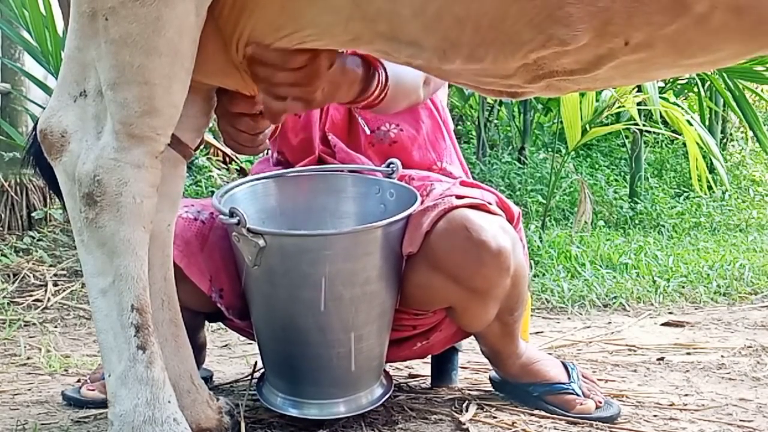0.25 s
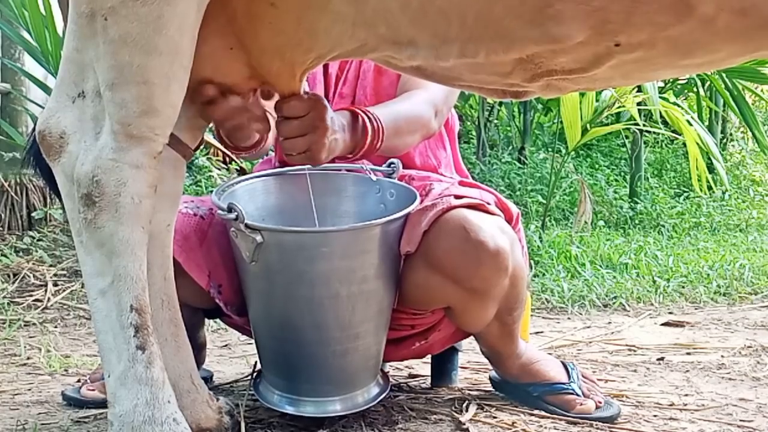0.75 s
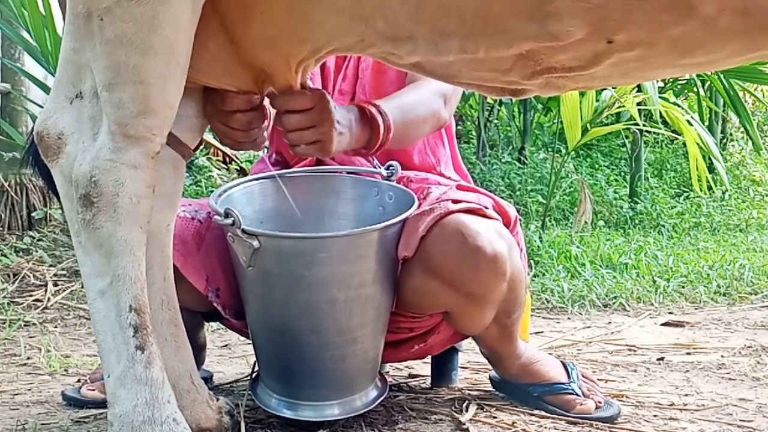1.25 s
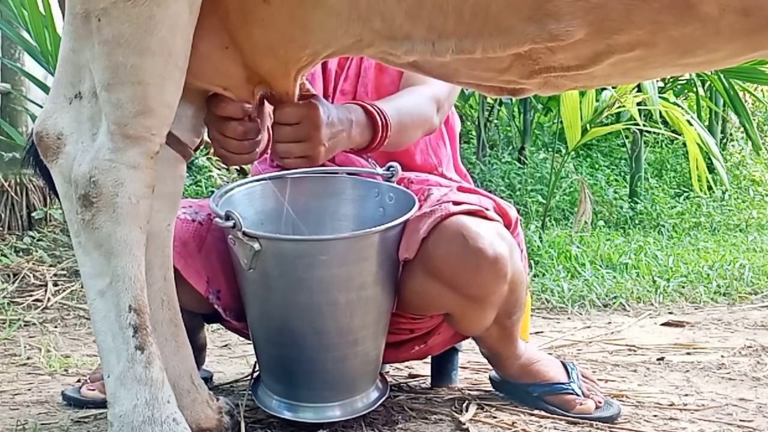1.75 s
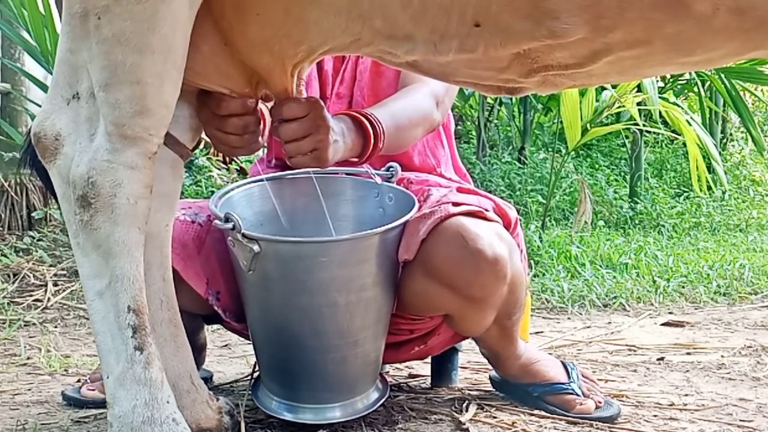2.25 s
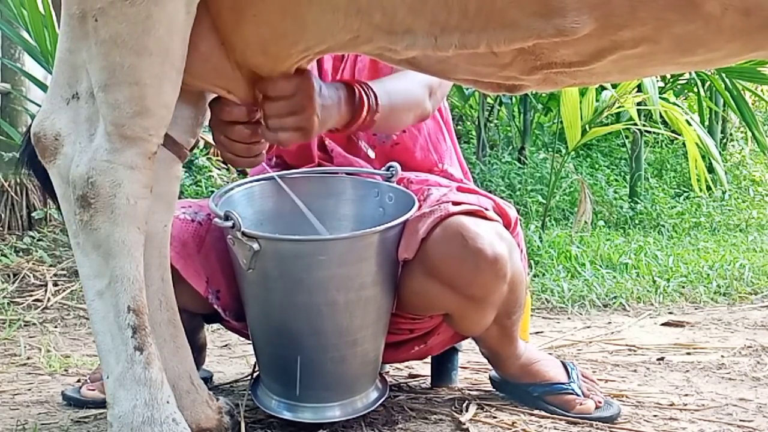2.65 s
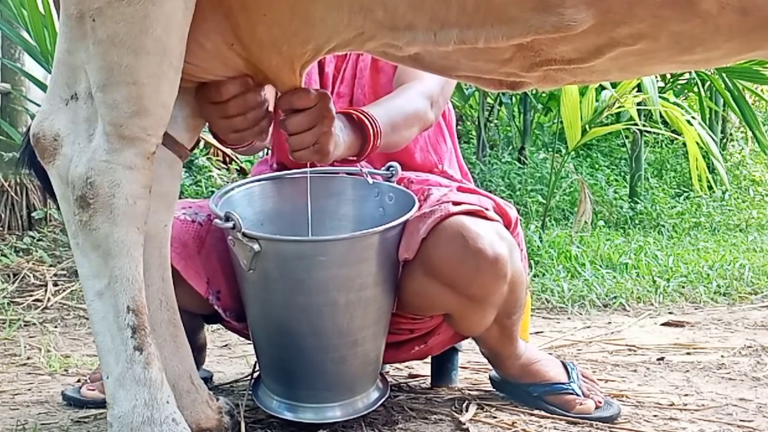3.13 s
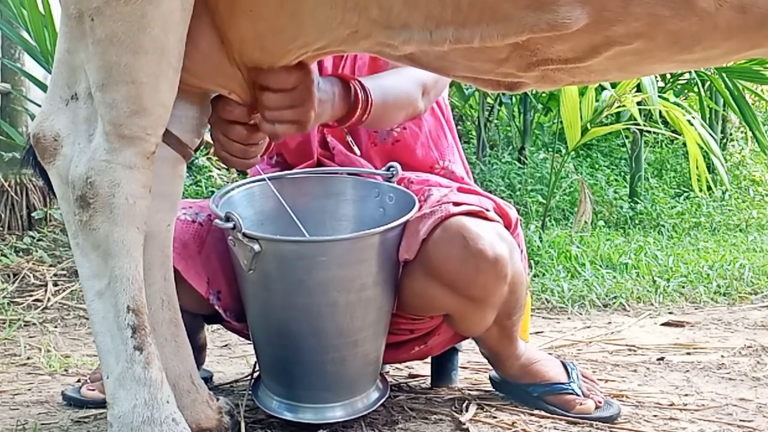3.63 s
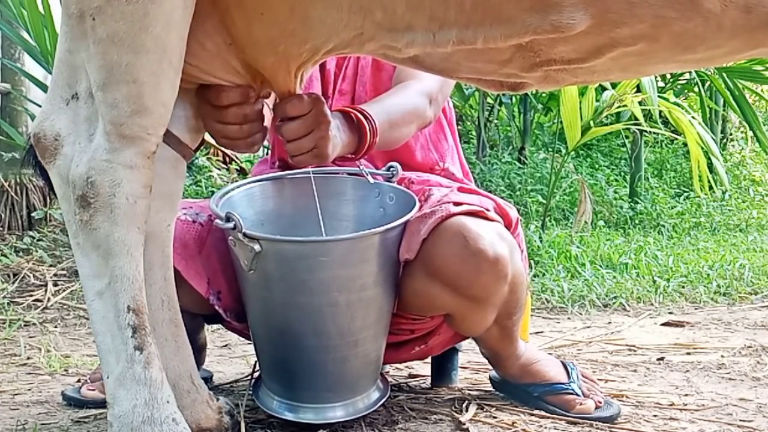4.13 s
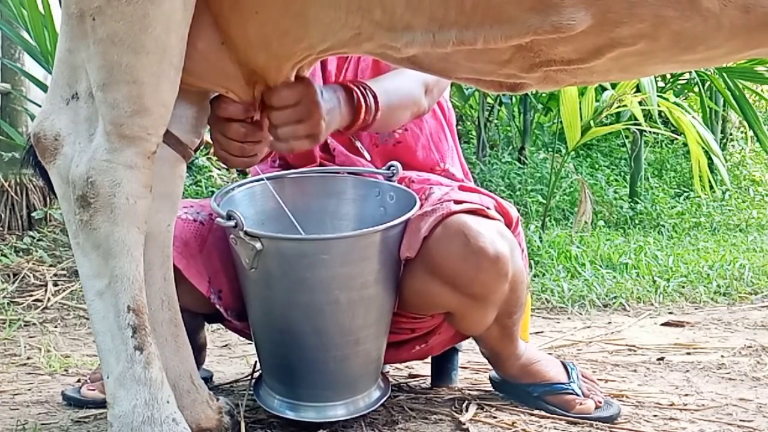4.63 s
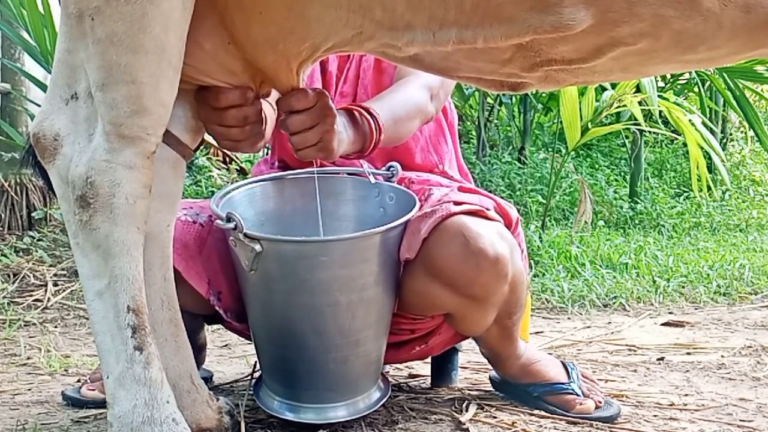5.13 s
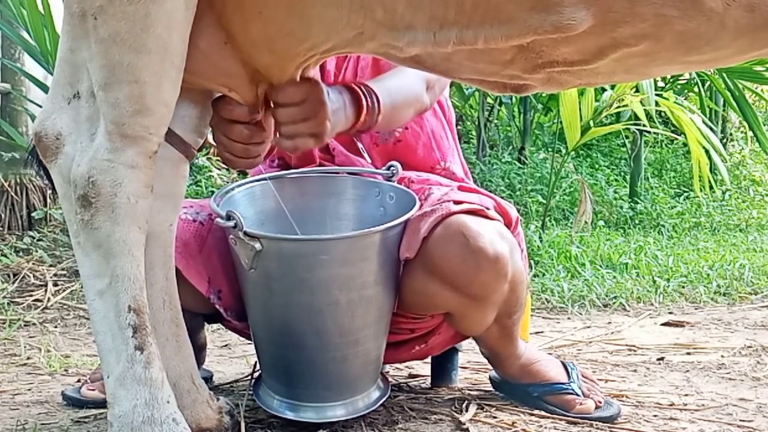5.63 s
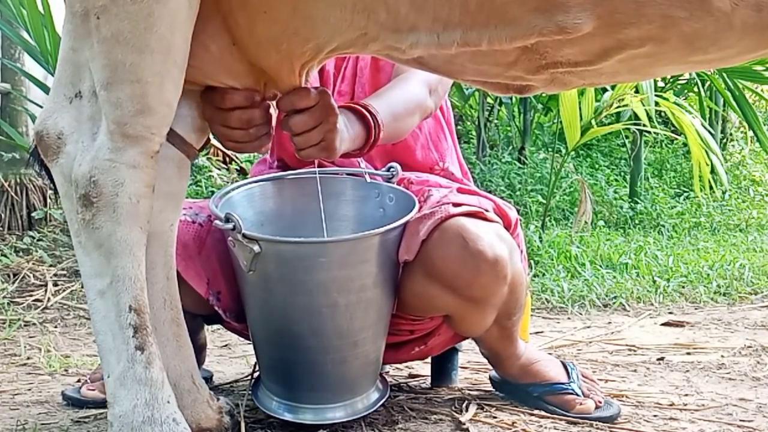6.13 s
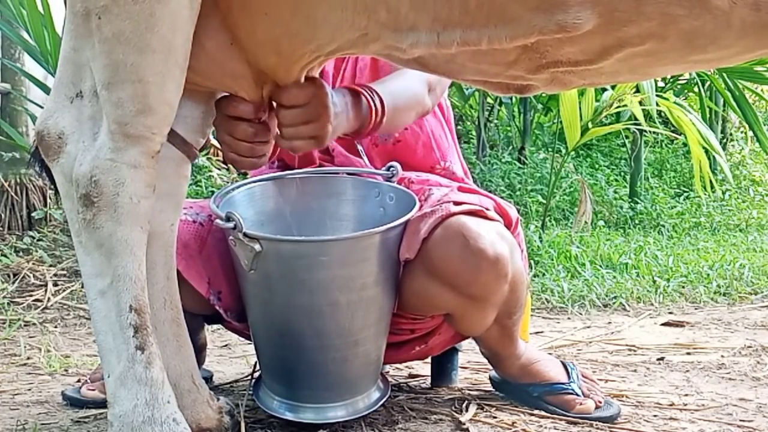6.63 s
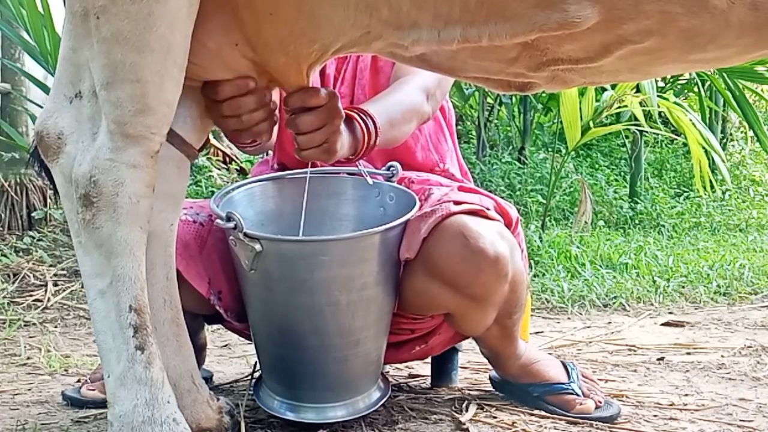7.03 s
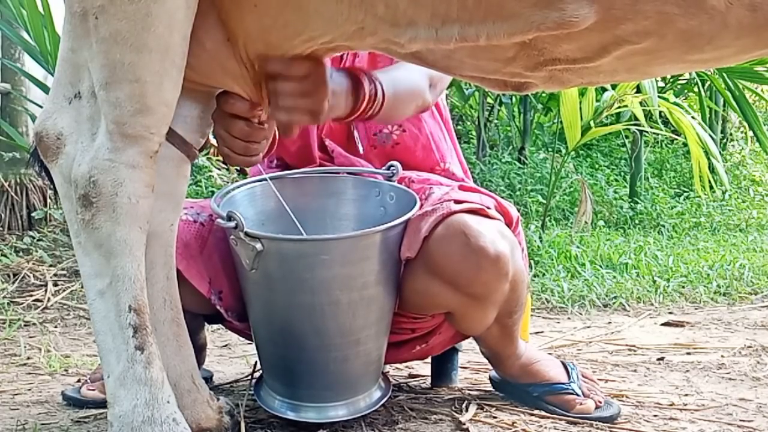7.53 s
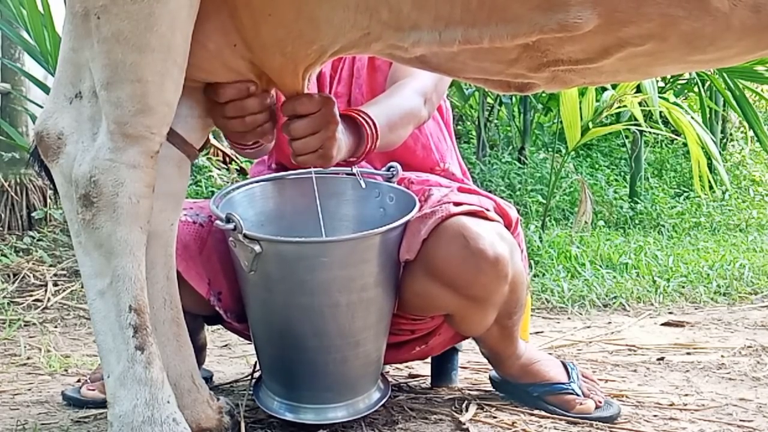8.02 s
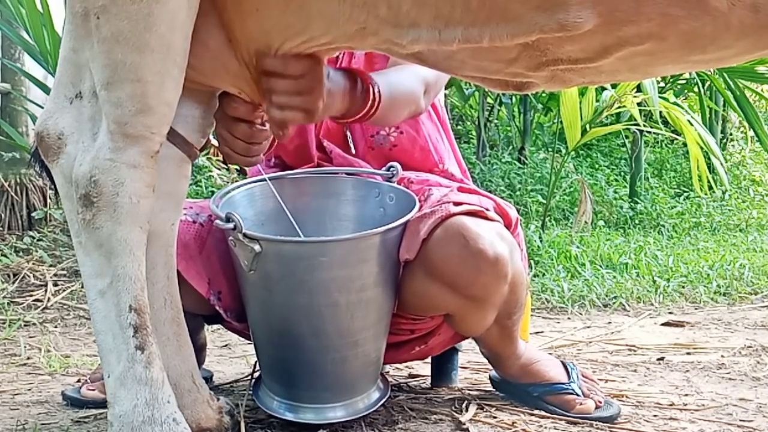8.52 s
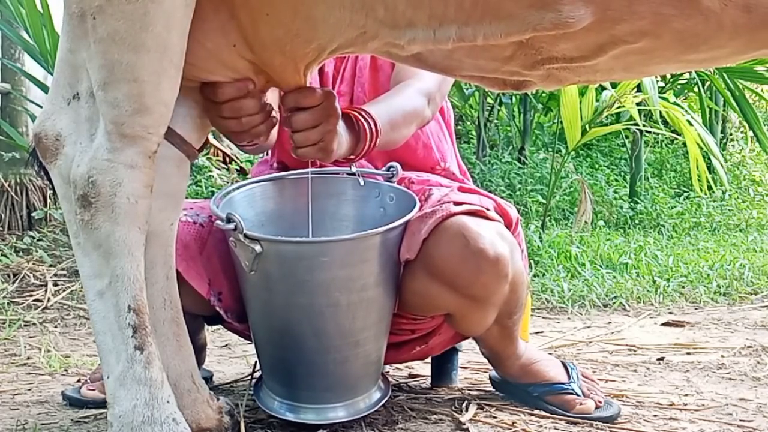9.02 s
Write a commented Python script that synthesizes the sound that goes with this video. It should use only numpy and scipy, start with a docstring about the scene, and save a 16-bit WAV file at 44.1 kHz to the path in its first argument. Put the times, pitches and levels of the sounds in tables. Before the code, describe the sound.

Hand milking outdoors: about two wet, ringing squirts a second spray into a hollow steel pail, with bubbly plops and light bangle jingles.

```python
"""Hand milking into a steel bucket

Outdoors on a quiet day, one microphone: a cow is milked by hand, the two hands taking turns.
Each jet is random drops that spray on the wall, splash in the foam and dig bubbles into the milk,
coloured by the resonances of the bucket; fat drops slap, large bubbles plop, pockets of air gurgle.
Bangles ring as the hands take a new grip; skin rubs softly, over filtered-noise air and low rumble."""
import sys
import numpy as np
from scipy import signal
from scipy.io import wavfile
from scipy.ndimage import uniform_filter1d, map_coordinates

SR = 44100
rng = np.random.default_rng(int(sys.argv[2]) if len(sys.argv) > 2 else 0)


def pcm_store(signal):
    """Save signal as 16-bit PCM."""
    levels = np.round(np.clip(np.atleast_2d(signal), -1, 1) * 32767)
    wavfile.write(sys.argv[1], SR, levels.astype(np.int16).T)


N = 408807  # samples
HZ = np.fft.rfftfreq(4096, 1 / SR)  # frequency grid of every dB curve


def amp(db):
    """Decibels to gain."""
    return 10 ** (np.asarray(db) / 20)


def evened(x):
    """Scales to an rms of 1."""
    return x / np.sqrt(np.mean(x ** 2) + 1e-20)


def steadied(x, size=2600):
    """Holds the rms near 1 over some hundredths of a second and keeps the finer grain."""
    power = uniform_filter1d(uniform_filter1d(x ** 2, size), size)
    return x / np.sqrt(power + 1e-20)


def add(mix, s, sound):
    """Mixes a sound in at s seconds."""
    part = mix[max(round(s * SR), 0):][:len(sound)]
    part += sound[:len(part)]


def spectrum(points):
    """Joins (Hz, dB) points on a log-frequency axis."""
    f, db = np.transpose(points)
    return np.interp(np.log(HZ + 1), np.log(f), db)


def lift(modes):
    """The dB curve of a set of resonances (Hz, width Hz, lift dB)."""
    return sum(db / (1 + (2 * (HZ - hz) / width) ** 2) for hz, width, db in modes)


def colour(x, curve_db):
    """Causal filter with the given dB curve: it rings after a blow, never before."""
    log_gain = np.log(amp(np.r_[curve_db, curve_db[-2:0:-1]]))
    minimum_phase = np.exp(np.conj(signal.hilbert(log_gain)))
    taps = np.fft.ifft(minimum_phase).real
    return signal.fftconvolve(x, taps[:len(HZ)])[:len(x)]


def resonate(x, hz, width):
    """A resonance of gain 1 that follows the curve hz."""
    turn = np.exp(2j * np.pi * np.cumsum(hz) / SR)
    r = np.exp(-np.pi * width / SR)
    # shift the pitch to zero, smooth, shift back
    return 2 * (turn * signal.lfilter([1 - r], [1, -r], x / turn)).real


def wobble(n, per_s):
    """Random drift of about unit size, joined by straight lines between per_s knots a second."""
    knots = rng.standard_normal(4096)
    return np.interp(np.arange(n) * per_s / SR, np.arange(len(knots)), knots)


def strike(t60, rise=0.00071):
    """The envelope of a blow: a quick swell, then a steady fade in dB."""
    t = np.arange(8000) / SR
    return amp(-60 * t / t60) * (1 - np.exp(-t / rise))


def tone(hz):
    """A steady partial as long as a blow."""
    return np.sin(2 * np.pi * hz * np.arange(8000) / SR)


# Colour of the open air before levelling: pitch_hz [Hz], level_db [dB, relative]
AIR_COLOUR = [(20, -27), (50, -7), (80, 2), (110, 10.5), (160, -0.5), (300, -4.5), (700, -10), (2000, -12),
              (5800, -13), (6700, 1), (7600, -4.5), (8800, -7), (9400, -23), (16000, -25.5)]


def air(air_db=-71.5, rumble_db=-86):
    """Faint outdoor hiss with a brighter band in the treble, over an uneven low rumble."""
    hiss = evened(colour(rng.standard_normal(N), spectrum(AIR_COLOUR)))
    low = spectrum([(25, -20), (70, -6.0), (108, -6.5), (150, 0), (400, -15.5), (2000, -88)])
    rumble = evened(colour(rng.standard_normal(N), low))
    drift_db = wobble(N, 4)
    gust_db = 3.5 * wobble(N, 14)
    return hiss * amp(air_db + drift_db) + rumble * amp(rumble_db + gust_db)


# Soft low bumps: start_s [s], length_s [s], level_db [dB rms before the swell]
BUMP_TIMES = [(0, 0.13, -70.5), (0.17, 0.21, -73), (0.399, 0.076, -67), (0.79, 0.06, -68.5),
              (1.66, 0.08, -69), (2.456, 0.14, -69), (5.591, 0.14, -72), (7.699, 0.17, -73)]


def bumps():
    """Dull swells of bass noise that rise a little out of the rumble."""
    out = np.zeros(N)
    bass_colour = spectrum([(25, -24), (65, -2), (130, 2), (250, -14), (1000, -61)])
    for s, length, db in BUMP_TIMES:
        n = round(length * SR)
        bass = colour(rng.standard_normal(n), bass_colour)
        add(out, s, amp(db) * evened(bass) * signal.windows.hann(n))
    return out


# Bangles knocking together, each swelling from 1 ms before start_s [s]; levels before the common trims:
# tick_db [dB], middle_low_db [dB], middle_high_db [dB], small_db [dB]
CLINK_HITS = [(0.086, -51, -65, -61, -84), (0.1265, -51, -67, -64, -80), (0.378, -26, -70, -48, -57),
              (0.5283, -43, -68, -76, -55), (0.5691, -58, -76, -63, -83), (0.6389, -52, -78, -88, -65),
              (1.8756, -41.5, -58, -68, -60), (2.85, -47, -56.5, -77, -56), (2.896, -37.5, -69, -64, -64),
              (4.801, -47, -62, -72, -71), (5.784, -47, -74, -83, -70), (5.836, -38, -57, -57, -61),
              (5.851, -46, -67, -62, -68), (6.2272, -58, -52.5, -76, -66), (6.7166, -51, -64, -85, -55),
              (7.685, -43.5, -53, -70, -81), (7.8071, -44, -62, -73, -53), (7.834, -38, -69, -53, -69),
              (7.8501, -34.5, -61, -57, -53.5), (8.788, -37.5, -71, -66, -50.5),
              (8.8326, -37.5, -63, -64, -55.5)]
# Ring modes of the bangles: ring [0 large, 1 middle low, 2 middle high, 3 small],
# pitch_hz [Hz, before a slight scatter], level_db [dB, relative], t60_s [s, before the wrist's damping]
BANGLE_MODES = [(0, 5180, 6.5, 0.095), (0, 9760, 6.5, 0.14), (1, 6500, -9, 0.084), (1, 6610, 1.5, 0.095),
                (2, 12700, -15, 0.086), (2, 12830, -1.5, 0.1), (3, 8440, 3, 0.081), (3, 15340, -22, 0.092)]
# the large bangle is only shaken along: its ring follows the tick (dB added to tick_db)
LARGE_BANGLE_DB = -38


def clinks(tick_trim_db=-9, tick_t60=0.037, ring_trim_db=3, damping=0.24):
    """A hard tick, then each bangle rings as strongly as it was hit, damped more or less by the wrist."""
    out = np.zeros(N)
    tick_colour = spectrum([(1000, -28), (4000, -23.5), (5500, -11.0), (7500, 2.5), (11000, -5.0), (15000, -13)])
    for s, db, *rings_db in CLINK_HITS:
        hit_db = (db + LARGE_BANGLE_DB, *rings_db)
        envelope = strike(tick_t60, rise=0.00034)
        tick = colour(rng.standard_normal(len(envelope)) * envelope, tick_colour)
        add(out, s - .001, amp(db + tick_trim_db) * tick / abs(tick).max())
        for which, hz, mode_db, t60 in BANGLE_MODES:
            partial = tone(hz * rng.normal(1, 0.0026))
            ring = partial * strike(t60 * np.exp(damping * rng.standard_normal()))
            add(out, s - .001, amp(hit_db[round(which)] + mode_db + ring_trim_db) * ring)
    return out


# A hand nudges up into the udder: start_s [s], length_s [s],
# level_db [dB rms of the body before the swell], pitch_hz [Hz, 0.3 of the way through]
NUDGE_TIMES = [(0.148, 0.22, -53.5, 286), (1.672, 0.074, -58.5, 294), (2.586, 0.3, -64, 312),
               (4.572, 0.17, -69.5, 305), (6.469, 0.12, -52.5, 300), (8.55, 0.11, -58.5, 277)]


def nudges(width=90, sag=0.4):
    """Skin rubs on soft flesh: a quick swell whose pitch sags as the udder gives way."""
    out = np.zeros(N)
    skin_colour = spectrum([(150, -9), (700, -1.0), (1400, -18.0), (4000, -12.5), (8000, -16), (14000, -25)])
    for s, length, db, hz in NUDGE_TIMES:
        u = np.linspace(0, 1, round(length * SR))
        pitch = hz * np.exp(-sag * (u - .3))
        body = resonate(rng.standard_normal(len(u)), pitch, width)
        body = resonate(body, pitch, width * 2)
        skin = colour(rng.standard_normal(len(u)), skin_colour)
        swell = np.sin(np.pi * np.sqrt(u)) ** 2
        add(out, s, amp(db) * swell * (evened(body) + amp(-12.5) * evened(skin)))
    return out


# Resonances of the air and steel of the bucket: pitch_hz [Hz], width_hz [Hz], lift_db [dB]
BUCKET_MODES = [(388, 11.6, 12.5), (437.8, 40.5, 20.5), (568, 18, 9.5), (822.5, 115, 12), (1104, 320, 4.5),
                (1313, 213, 14), (1710, 110, 0.5), (1930, 38, 1), (2630, 380, 9.5), (3380, 370, 6.5),
                (4303, 95, 4), (4300, 150, -0.5), (5960, 290, 3), (7370, 330, 3.5), (7940, 52, 10)]


def bucket_hollow():
    """The dB curve that the hollow of the bucket lays on sounds made inside it."""
    return lift(BUCKET_MODES)


def walls(x, t60=0.042, echo_db=2):
    """Sound bounces between the steel walls, in another random pattern at every call."""
    t = np.arange(4096) / SR
    echoes = rng.standard_normal(len(t)) * amp(-60 * t / t60) * (t > .0005)
    echoes = echoes / np.linalg.norm(echoes)
    return x + amp(echo_db) * signal.fftconvolve(x, echoes)[:len(x)]


def drops(n, per_s, spread_db):
    """A random train of tiny impacts, a few much larger than the rest."""
    chance = rng.random(n)
    size = np.minimum(rng.exponential(1, n), 4)
    return (chance < per_s / SR) * amp(spread_db * size) * rng.choice([-1, 1], n)


def bubble(hz, cycles, rise):
    """A bubble swells and rings for a few cycles, its pitch rising as it nears the surface."""
    age = np.arange(3000) / SR * hz / cycles  # in decay times
    swell = 1 - np.exp(-(age * cycles) ** 2 * 2)
    return np.sin(2 * np.pi * cycles * age * (1 + rise * age)) * np.exp(-age) * swell


def bubbling(n, low_hz, high_hz, per_s, cycles, spread_db=2.5, count=20):
    """Bubbles of many sizes, each size born at its own random moments."""
    place = (np.arange(count) + rng.random(count)) / count
    out = np.zeros(n)
    for hz in low_hz * (high_hz / low_hz) ** place:
        births = drops(n, per_s / count, spread_db)
        out += signal.fftconvolve(births, bubble(hz, cycles, 0.0213))[:n]
    return out


def small_bubbles(n):
    """Air dragged just under the surface rings in the hollow of the bucket."""
    return colour(bubbling(n, 575.8, 1171, 300, 8.6), bucket_hollow())


PATCH_DB = 3.5  # spread of the wandering patches (dB)


def wandering(x, patch_hz=330, patch_s=0.03977):
    """As the landing place moves, other resonances are favoured: patches of spectrum swell and fade."""
    hz, t, z = signal.stft(x, SR, nperseg=512, noverlap=384)
    place = np.meshgrid(hz / patch_hz, t / patch_s, indexing="ij")
    field = map_coordinates(rng.standard_normal((256, 64)), place, order=3, mode="mirror")
    patches_db = PATCH_DB * np.clip(evened(field), -2.2, 2.2)
    return signal.istft(z * amp(patches_db), SR, nperseg=512, noverlap=384)[1][:len(x)]


# the teat opens to a thin jet, the fist closes, the flow arches and sags
OPEN_DB_PER_S, LEAD_DB, ATTACK_S, ARCH_DB = 360, -13.5, 0.061, 2.94
# the squeeze is never even: (scale dB, changes a second)
SURGE_DB, SURGE_PER_S = 1.28, 29.8
# the hand lets go and the flow dies ever faster
RELEASE_S, RELEASE_DB, RELEASE_BEND = 0.07, -19, 1.08


def flow(t, lead, squeeze, sag_db):
    """The strength of the jet in dB, t seconds into a pull."""
    emptied = np.clip((t - lead) / squeeze, 0, 1)
    opening = OPEN_DB_PER_S * np.minimum(t, 0)
    thin_jet = LEAD_DB * np.clip((lead - t) / ATTACK_S, 0, 1)
    hold = ARCH_DB * np.sin(np.pi * emptied) - sag_db * emptied
    surge = SURGE_DB * wobble(len(t), SURGE_PER_S)
    release = RELEASE_DB * (np.maximum(t - lead - squeeze, 0) / RELEASE_S) ** RELEASE_BEND
    return opening + thin_jet + hold + surge + release


# One pull on a teat: start_s [s], thin_lead_s [s], full_squeeze_s [s],
# wall_s [s from the start until the jet finds the milk], flow_sag_db [dB],
# wall_spray_db [dB], milk_spray_db [dB], mist_db [dB tilt of the spray's top treble],
# splash_db [dB in the foam], small_bubbles_db [dB in the milk], crater_pitch_hz [Hz in the foam];
# the four layer levels are rms before the flow and the wall shape them
PULLS = [(0.677, 0.043, 0.033, 0.122, 10, -70, -69.5, 9, -81, -92, 2300),
         (0.895, 0.14, 0.13, 0.2, 4, -49.5, -46.5, 0, -43, -47.5, 2660),
         (1.465, 0.089, 0.066, 0.037, 5.5, -48, -56.5, 2.5, -61.5, -69, 2700),
         (1.64, 0.048, 0.078, 0.01, 1.5, -61, -65, 4, -64, -73, 2140),
         (1.968, 0.087, 0.25, 0.03, 4.5, -66, -54, 2.5, -54.5, -59, 2450),
         (2.473, 0.099, 0.25, 0.1, 9, -43, -49, -5.5, -51.5, -73.5, 2570),
         (2.982, 0.041, 0.27, 0.0016, 7.5, -69, -47.5, 1, -46, -54.5, 2290),
         (3.445, 0.06, 0.25, 0.12, 3.5, -48.5, -54, 0, -53, -72, 2880),
         (4.012, 0.046, 0.21, 0.08, 9, -44, -42, -2, -48.5, -79, 2070),
         (4.438, 0.024, 0.21, 0.057, -3, -51.5, -60, 0.5, -57.5, -75, 2300),
         (4.915, 0.077, 0.24, 0.293, 7.5, -44.5, -41, 0.5, -50, -69, 1300),
         (5.343, 0.094, 0.26, 0.087, 13, -51.5, -55.5, 0, -49.5, -57.5, 2250),
         (5.915, 0.18, 0.15, 0.23, 13, -45.5, -51, 1.5, -46, -46.5, 1350),
         (6.395, 0.064, 0.16, 0.026, -8, -51, -65, 0, -62, -79, 2320),
         (6.921, 0.056, 0.29, 0.075, 6.5, -45.5, -57, -1, -52.5, -63, 2390),
         (7.399, 0.054, 0.15, 0.019, -3, -43.5, -65.5, 3.5, -59.5, -71, 2310),
         (7.885, 0.063, 0.33, 0.072, 18, -51.5, -52.5, 4.5, -44.5, -50.5, 1440),
         (8.352, 0.077, 0.26, 0.11, -2.5, -53.5, -63, 4.5, -59, -82, 2010),
         (8.933, 0.076, 0.21, 0.03, 4.5, -46, -53, 4, -50, -58.5, 2140)]
# Colour of the splash in the foam before levelling: pitch_hz [Hz], level_db [dB, relative]
SPLASH_COLOUR = [(200, -85), (800, -25.5), (1150, -14), (1800, 4), (2700, -4), (3200, -2), (4500, 5.5),
                 (6500, -20.5), (16000, -34)]
# Colour of the spray before levelling, also in the spurts: pitch_hz [Hz], level_db [dB, relative]
SPRAY_COLOUR = [(500, -64), (2500, -16), (4300, -4), (6000, 1), (7700, -0.5), (9000, -4), (10500, -13),
                (12500, -16), (14000, -19.5), (16000, -17.5)]
# the jet slides from wall to milk; on the wall it splashes less, traps little air and rings at WALL_HZ
SLIDE_S, WALL_SPLASH_DB, WALL_BUBBLES_DB, WALL_HZ = 0.02, -4.5, -25, 2780
BUBBLE_GROWTH = 1.4  # small bubbles grow faster than the flow (dB per dB)
MIST_HZ, MIST_WIDTH_HZ = 7500, 2200  # where the hiss of the fine mist sets in


def squirt(start, lead, squeeze, wall_s, sag_db, wall_spray_db, milk_spray_db, mist_db,
           splash_db, bubbles_db, crater_hz):
    """One pull on a teat: the jet breaks into drops, flutters, and wanders between wall, foam and milk."""
    t = np.arange(-.07, lead + squeeze + .14, 1 / SR)
    n = len(t)
    flow_db = flow(t, lead, squeeze, sag_db)
    on_wall = .5 - .5 * np.tanh((t - wall_s) / SLIDE_S)
    flutter_db = 2 * wobble(n, 89.28) + 1.2 * wobble(n, 300)  # the jet necks and breaks unevenly
    travel = np.linspace(0, np.pi / 2, n)  # fades from one echo pattern to another

    def patter(points, per_s, spread_db, pops):
        """Drops and popping foam cells echo in the bucket."""
        hits = evened(drops(n, per_s, spread_db) * amp(flutter_db)) + pops
        echoed = np.cos(travel) * walls(hits) + np.sin(travel) * walls(hits)
        return evened(colour(wandering(echoed), spectrum(points) + bucket_hollow()))

    foam_pops = 0.3 * evened(bubbling(n, 1111.4, 4456, 400, 13.7, spread_db=4.0))
    splash = patter(SPLASH_COLOUR, 1600, 2.6, foam_pops)
    ring_hz = crater_hz + (WALL_HZ - crater_hz) * on_wall
    crater = evened(resonate(splash, ring_hz, 1230))  # the jet digs a crater that rings
    splash = splash + amp(6.5) * crater

    fine_pops = 0.29 * evened(bubbling(n, 4500, 11020, 300, 30, spread_db=2.5))
    spray = patter(SPRAY_COLOUR, 6500, 4.5, fine_pops)
    # a finer mist hisses higher
    spray = colour(spray, mist_db * np.clip((HZ - MIST_HZ) / MIST_WIDTH_HZ, 0, 1))

    splash_level = flow_db + splash_db + WALL_SPLASH_DB * on_wall
    spray_level = flow_db + milk_spray_db + (wall_spray_db - milk_spray_db) * on_wall
    bubble_level = BUBBLE_GROWTH * flow_db + bubbles_db + WALL_BUBBLES_DB * on_wall
    layers = ((splash, splash_level), (spray, spray_level), (small_bubbles(n), bubble_level))
    jet = sum(steadied(x) * amp(db) for x, db in layers)
    return start + t[0], jet * signal.windows.tukey(n, .04)


# The jet digs deep, or its last dribble falls in, and the milk gurgles:
# start_s [s], length_s [s], large_bubbles_db [dB rms], small_bubbles_db [dB rms], both before the heave
GURGLE_TIMES = [(1.012, 0.16, -59.5, -66), (1.337, 0.015, -90, -80), (1.444, 0.055, -77, -86),
                (1.546, 0.038, -64, -71), (2.01, 0.05, -67.5, -80), (2.112, 0.12, -58, -57),
                (2.903, 0.03, -75, -91), (3.02, 0.03, -67, -56.5), (3.178, 0.18, -50.5, -55.5),
                (3.573, 0.046, -67.5, -61.5), (3.995, 0.035, -69.5, -73), (4.21, 0.021, -95, -69.5),
                (4.744, 0.035, -85, -72.5), (5.097, 0.011, -80, -81), (5.291, 0.046, -73, -70.5),
                (5.455, 0.21, -53.5, -61.5), (6.095, 0.012, -86, -56.5), (6.15, 0.023, -64.5, -68),
                (6.265, 0.051, -65, -63.5), (6.483, 0.15, -61, -69), (7.033, 0.012, -63, -74),
                (7.164, 0.16, -52.5, -62.5), (7.493, 0.076, -64, -71), (7.989, 0.3, -52, -58),
                (8.52, 0.19, -65.5, -60), (8.945, 0.028, -65.5, -76), (9.029, 0.15, -60.5, -73),
                (9.19, 0.09, -49.5, -59)]
# every gurgle swells and dies quickly
DIG_DB_PER_S, CLOSE_DB_PER_S = 527, 384


def gurgle(start, length, large_db, small_db, heave_db=1.0):
    """The jet digs deeper: large bubbles boom in the bucket until the pocket closes."""
    t = np.arange(-.08, length + .12, 1 / SR)
    n = len(t)
    boom_colour = 0.86 * bucket_hollow() + spectrum([(120, -20.5), (300, -3)])
    deep = colour(bubbling(n, 318.2, 550, 200, 7.2), boom_colour)
    swell_db = DIG_DB_PER_S * np.minimum(t, 0) - CLOSE_DB_PER_S * np.maximum(t - length, 0)
    swell_db = swell_db + heave_db * wobble(n, SURGE_PER_S)
    pocket = amp(large_db) * steadied(deep) + amp(small_db) * steadied(small_bubbles(n))
    return start + t[0], amp(swell_db) * pocket


# Fat drops that slap the milk or the wall, each swelling from 1 ms before start_s [s]:
# level_db [dB peak of the burst before the common trim], pitch_hz [Hz]
SLAP_HITS = [(1.045, -31, 2630), (1.3892, -47, 2400), (2.0007, -48, 2410), (2.54, -41, 6940),
             (3.021, -36.5, 1900), (3.0347, -38.5, 1350), (3.593, -44, 2600), (4.016, -45, 6000),
             (4.568, -41, 3480), (4.6625, -50, 8220), (4.9114, -42.5, 7340), (5.0457, -34, 7600),
             (5.4477, -54, 1416), (5.6631, -42, 2200), (6.1497, -36, 1445), (6.4578, -39.5, 3300),
             (6.495, -41, 1290), (7.013, -36.5, 1736), (7.0319, -35, 888), (7.4646, -37.5, 3350),
             (7.5061, -37.5, 1348), (7.596, -39, 4590), (7.896, -49.5, 1365), (7.97, -30.5, 7160),
             (8.4248, -39.5, 4620), (8.4848, -41, 1300), (9.0235, -42, 1280), (9.1443, -36.5, 1710)]


def slaps(t60=0.036, breadth=0.54, trim_db=-1, ping_t60=0.093, ping_db=-8):
    """A fat drop bursts in a short spatter and pings at its own pitch."""
    out = np.zeros(N)
    soft_milk = spectrum([(7500, -7.5), (11000, -5.5), (15000, -28)]) + bucket_hollow()
    for s, db, hz in SLAP_HITS:
        octaves = np.log2((HZ + 1) / hz)
        band_db = -10 * np.log10(1 + (octaves / breadth) ** 6)
        envelope = strike(t60)
        spatter = rng.standard_normal(len(envelope)) * envelope
        burst = colour(spatter, np.maximum(band_db, -60) + soft_milk)
        ping = amp(ping_db) * tone(hz) * strike(ping_t60)
        add(out, s - .001, amp(db + trim_db) * (burst / abs(burst).max() + ping))
    return out


# The jet strikes the bare steel squarely: start_s [s], length_s [s], level_db [dB rms before the taper]
SPURT_TIMES = [(2.528, 0.081, -49), (3.029, 0.029, -48), (5.014, 0.08, -45), (6.058, 0.058, -40.5),
               (6.946, 0.033, -46), (7.963, 0.075, -45)]


def spurts(mist_db=3, taper=0.56):
    """A short, bright burst of dense spray: crowded drops echo between the walls."""
    out = np.zeros(N)
    bright = spectrum(SPRAY_COLOUR) + bucket_hollow() + mist_db * (HZ > MIST_HZ)
    for s, length, db in SPURT_TIMES:
        n = round(length * SR)
        hiss = colour(walls(drops(n, 9000, 3.5)), bright)
        add(out, s, amp(db) * evened(hiss) * signal.windows.tukey(n, taper))
    return out


# Large single bubbles: start_s [s], level_db [dB before decay and the common trim], pitch_hz [Hz at birth]
PLOP_TIMES = [(3.044, -42.5, 530), (3.244, -47, 390), (5.491, -38, 450), (5.538, -33, 460),
              (6.495, -35.5, 825), (6.514, -42, 324), (7.305, -54, 419), (8.052, -34, 446),
              (8.164, -38, 366), (8.665, -42, 390), (9.022, -33, 792)]


def plops(cycles=6.9, trim_db=-2):
    """Large pockets of air that the jet drags under the milk ring as single bubbles."""
    out = np.zeros(N)
    for s, db, hz in PLOP_TIMES:
        add(out, s, amp(db + trim_db) * bubble(hz, cycles, 0.015))
    return out


def scene():
    """Milk, hands, bangles and the open air."""
    milk = slaps() + spurts() + plops()
    for row in PULLS:
        add(milk, *squirt(*row))
    for row in GURGLE_TIMES:
        add(milk, *gurgle(*row))
    return (milk + nudges() + clinks() + bumps() + air())[None]


EDGE_HZ = 15700  # upper band limit


def record(dry):
    """The microphone port resonates in the top treble; then the band limit."""
    heard = colour(dry[0], lift([(14670, 880, 14.7), (15210, 240, 20.2)]))
    low_pass = signal.firwin(511, EDGE_HZ, window=("kaiser", 9), fs=SR)
    return signal.oaconvolve(heard, low_pass, "same")[None]


dry = scene()
out = record(dry)
pcm_store(out)
```